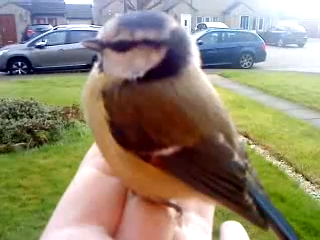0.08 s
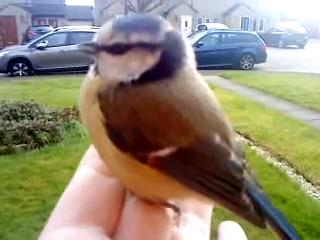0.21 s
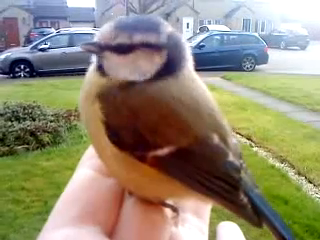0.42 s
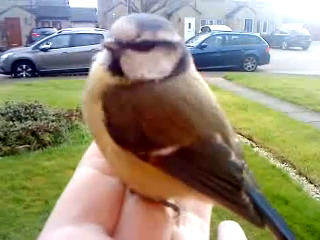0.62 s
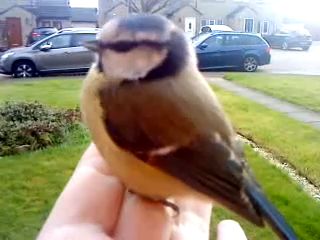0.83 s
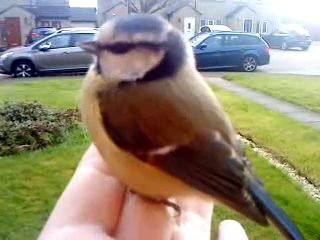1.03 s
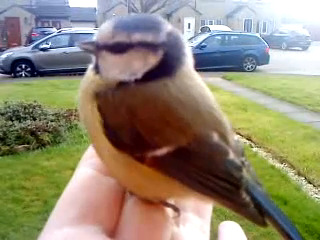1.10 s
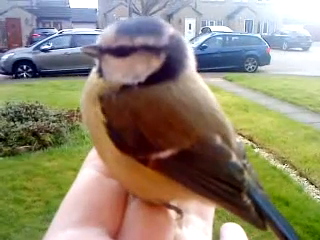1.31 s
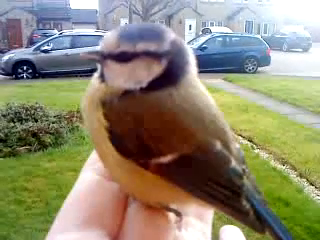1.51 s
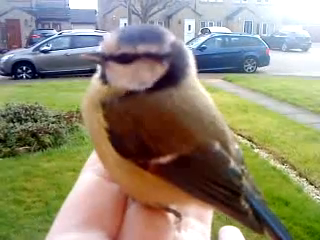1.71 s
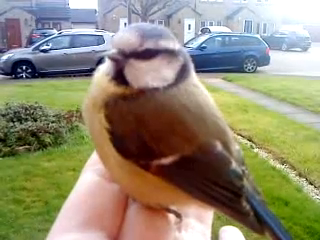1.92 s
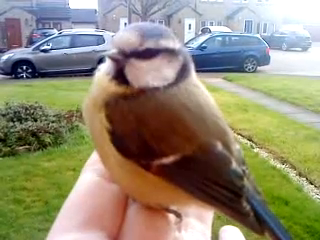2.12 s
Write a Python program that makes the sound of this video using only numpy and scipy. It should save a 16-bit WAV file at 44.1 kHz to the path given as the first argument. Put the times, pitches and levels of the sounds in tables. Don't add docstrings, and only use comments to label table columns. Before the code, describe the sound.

A small bird held close chatters in dry, clicking bursts while wind buffets the microphone outdoors

```python
import sys
import numpy as np
from scipy import signal
from scipy.io import wavfile

SR = 44100
rng = np.random.default_rng(int(sys.argv[2]) if len(sys.argv) > 2 else 0)


def level_to_linear(level):
    exponent = np.asarray(level, float) / 20
    return 10 ** exponent


def unload_audio(sound):
    columns = np.transpose(np.atleast_2d(sound))
    steps = np.round(np.clip(columns, -1, 1) * 32767)
    wavfile.write(sys.argv[1], SR, steps.astype(np.int16))


N = 94815

# t/s, peak level/dB, ring f/Hz
CLICKS = [(1.0404, -18, 3890), (1.0436, -10, 3900), (1.0455, -11, 3850), (1.0471, -14, 3890),
          (1.0506, -13, 3890), (1.2062, -13, 3930), (1.2108, -13, 3870), (1.2126, -12.5, 3650),
          (1.2141, -20, 4150), (1.3595, -13, 3850), (1.5155, -17, 4000), (1.5191, -18, 3990),
          (1.5208, -13, 4040), (1.5228, -15, 4040), (1.6921, -10, 3960), (1.6941, -12, 4010),
          (1.6962, -14, 3980), (1.6988, -17.5, 3500), (1.8513, -18, 4050), (1.8546, -20, 4020),
          (1.8596, -17, 3960), (1.862, -18, 3270), (1.8638, -21, 4150)]
# t/s, peak level/dB, ring f/Hz
MORE_CLICKS = [(0.6888, -38.5, 3900), (0.8306, -25.5, 4070), (0.8367, -29, 4060), (0.876, -37, 4000),
               (1.0337, -30.5, 4170), (1.0346, -27, 3930), (1.037, -23, 3790), (1.048, -20, 3850),
               (1.0491, -22.5, 3860), (1.056, -34, 4220), (1.2164, -30, 3800), (1.218, -27, 3750),
               (1.2505, -43, 3720), (1.3586, -28, 3850), (1.3645, -26, 3860), (1.385, -37.5, 4100),
               (1.524, -17, 4000), (1.526, -33, 4050), (1.528, -32, 4050), (1.542, -29.5, 4100),
               (1.6674, -38, 4000), (1.6908, -29, 4000), (1.6975, -21, 4000), (1.7002, -23, 4000),
               (1.704, -32, 4050), (1.7075, -43, 4070), (1.7134, -30, 4100), (1.869, -32, 4120),
               (1.8706, -29.5, 4050), (1.877, -36, 4190), (1.8792, -32, 4200), (1.987, -42.5, 3730),
               (2.1042, -44.5, 4050)]
# start t/s, length t/s, level/dB, side-mode level/dB
RASPS = [(0.8394, .003, -41, -15), (0.844, 0.0052, -32, -11.5), (0.85, 0.007, -34.5, -10.5),
         (0.857, .003, -40, -11), (0.881, 0.044, -56, -6), (1.027, 0.016, -34.5, 8),
         (1.049, 0.0058, -30.5, -5), (1.167, 0.035, -51.5, 15), (1.2, 0.023, -31.5, 4.5),
         (1.243, 0.012, -51, 16.5), (1.352, 0.02, -35.5, 10), (1.516, 0.016, -42, 21.5),
         (1.53, 0.016, -49, 3), (1.6655, 0.0044, -43, 18), (1.685, 0.0047, -38, 10),
         (1.51, 0.0045, -52, 9.5), (1.693, 0.0084, -28.5, 3.5), (1.7, 0.006, -36, 9),
         (1.859, 0.011, -30, 14), (1.874, 0.014, -43.5, 14), (2.1, 0.015, -48, 8)]
# f/Hz, level/dB, time to fall 60 dB t/s
SIDE_MODES = [(614, -22.5, 0.0078), (1753, -24, 0.0063), (1950, -17.5, 0.0053), (2640, -14.5, 0.004),
              (3180, -16.5, 0.0081), (4610, -20.5, 0.0045), (5770, -51, 0.0095), (5806, -22.5, 0.017),
              (6650, -31, 0.016), (7900, -17, 0.0016)]
# t/s, level/dB
GUST = [(0.0, -51), (0.2, -48), (0.26, -24.5), (0.32, -49), (0.409, -24), (0.44, -27.5), (0.5, -29.5),
        (0.9, -18.5), (0.99, -24.5), (1.02, -21), (1.15, -27.5), (1.18, -39), (1.23, -32), (1.3, -19.5),
        (1.62, -27), (1.87, -37.5), (1.93, -35.5), (2.15, -29)]
# start t/s, length t/s, level/dB, eddy brightness f/Hz
FLURRIES = [(0.163, 0.17, -38, 93), (0.394, 0.027, -37, 107), (0.494, 0.062, -30.5, 133.3),
            (0.561, 0.067, -34, 292), (0.602, 0.097, -30, 208), (0.733, 0.084, -30.5, 200),
            (0.757, 0.033, -36, 486), (0.558, 0.021, -37, 332), (0.8, 0.058, -32, 175),
            (0.854, 0.068, -29.5, 111), (0.985, 0.096, -34, 109), (1.101, 0.093, -27.5, 89.6),
            (1.201, 0.045, -29.5, 205), (1.227, 0.045, -29, 152), (1.359, 0.041, -33, 190),
            (1.498, 0.083, -33.5, 159), (1.568, 0.083, -29, 102), (1.619, 0.12, -34, 120),
            (1.931, 0.041, -36, 108)]
# t/s, peak level/dB, width t/ms
PUSHES = [(.512, -21, 3.4), (.5728, -12, 1.7), (.5922, -16, 2.2), (.6068, -9.5, 2.6), (.6182, -19, 2.1),
          (.6583, -19, 2.2), (.6812, -22, 4.6), (.7263, -22, 2.9), (.7463, -20, 2.5), (.751, -19, 1.7),
          (.7743, -16, 1.5), (.7833, -17, 1.6), (.7901, -21, 1.8), (.7999, -12, 2.1), (.8205, -17, 3.3),
          (.8658, -22, 2.6), (1.0291, -17, 2.8), (1.2226, -10, 1.5), (1.2444, -22, 7), (1.3759, -18, 2.5),
          (1.5103, -20, 3), (1.5477, -11.5, 3.2), (1.0424, -22, 4.6), (1.1413, -23, 4.8)]
# t/s, peak level/dB, width t/ms
PULLS = [(.249, -24, 9), (.4038, -20, 4.5), (.526, -14.5, 3.9), (.5858, -13, 2.2), (.6025, -18, 2.5),
         (.6401, -19, 1.4), (.6925, -22, 4.9), (.7427, -20, 1.7), (.7552, -18, 3), (.7677, -11, 3.2),
         (.846, -18, 1.7), (.8795, -15, 3.7), (1.136, -16, 4.6), (1.2318, -21, 5), (1.26, -20, 3.5),
         (1.3719, -24, 2.2), (1.3805, -24, 2.5), (1.5146, -12, 2.9), (1.5522, -18, 3.6), (.5772, -18, 3),
         (.6141, -21, 3), (1.6002, -19, 5.1), (1.6225, -22, 5.6), (1.6695, -22, 5.8)]
# multiple of its pitch, level/dB
ENGINE_HARMONICS = [(1, -47.5), (2, -48), (3, -61)]
# t/s, level/dB
ENGINE_SWELL = [(0, -1.5), (.08, 4), (.16, -2.5), (.29, 8.5), (.37, -3.5), (0.431, 2.5), (0.902, -0.6),
                (1.5, -5), (1.9, 1.2), (2.15, -2.5)]
# start t/s, length t/s, first f/Hz, last f/Hz, level/dB
WHISTLES = [
    (.895, .122, 7500, 6800, -63),
    (1.13, .072, 7400, 7000, -62.5),
]
# f/Hz, level per Hz/dB
STREET_COLOR = [(40, -6), (130, -8.5), (300, -10.5), (600, -24.5), (1300, -28.5), (4000, -34),
                (6500, -40.5), (8500, -39)]
# t/s, level/dB
TRAFFIC = [(0, 0), (.45, 0.5), (.7, -2.5), (1.4, -1.5), (1.7, -1.1), (2.15, -0.4)]

MAIN_T60_S, MAIN_RISE_HZ = 0.0056, 880
AFTER_HZ, AFTER_T60_S, AFTER_DB = 4200, 0.022, -24
MODE_LUCK_DB, SNAP_LUCK_DB = 3.0, 2.5
CLICK_LEAD_S, RASP_HZ, RASP_CLICKS_PER_S = 0.0003, 4126, 2500
GUST_HZ, EDDY_SLOPE, EDDIES_PER_S = 49.3, 2.64, 600
PORT_LAG_S, PORT_TOP_HZ, PORT_CUT_HZ = 0.0006, 750, 24
ENGINE_HZ, ENGINE_SAG_HZ_PER_S, ENGINE_FLUTTER_DB = 147.3, 11.0, 3.2


def t():
    return np.arange(N) / SR


def curve(points):
    return np.interp(t(), *np.transpose(points))


def rms_one(x):
    return x / np.sqrt(np.mean(x ** 2) + 1e-20)


def drift(rate):
    r = np.exp(-2 * np.pi * rate * 40 / SR)
    noise = rng.standard_normal(N // 40 + 2002)
    slow = signal.lfilter([1], [1, -2 * r, r * r], noise)[2000:]
    return np.interp(np.arange(N) / 40, np.arange(len(slow)), rms_one(slow - slow.mean()))


def butter(x, order, hz, kind="low"):
    return signal.sosfilt(signal.butter(order, hz, kind, fs=SR, output="sos"), x)


def ring(clicks, hz, t60):
    r, w = level_to_linear(-60 / (t60 * SR)), 2 * np.pi * hz / SR
    return signal.lfilter([0, np.sin(w)], [1, -2 * r * np.cos(w), r * r], clicks + 1e-18)


def beak_and_throat(clicks, hz, snap_db):
    r, w = np.exp(-2 * np.pi * MAIN_RISE_HZ / SR), 2 * np.pi * hz / SR
    main = ring(clicks, hz, MAIN_T60_S)
    main = signal.lfilter([1 - r], [1, -2 * r * np.cos(w), r * r], main) * 2 * np.sin(w)
    out = level_to_linear(5.0) * main + level_to_linear(AFTER_DB) * ring(clicks, AFTER_HZ, AFTER_T60_S)
    luck = np.clip(rng.normal(0, 1, (3, len(SIDE_MODES))), -1.5, 1.5)
    snap_db = snap_db + SNAP_LUCK_DB * luck[1, 0]
    for k, (mode_hz, db, t60) in enumerate(SIDE_MODES):
        gain = level_to_linear(db + snap_db + MODE_LUCK_DB * luck[0, k])
        out = out - gain * ring(clicks, mode_hz * (1 + 0.056 * luck[2, k]), t60)
    return out


def chatter():
    out, size = np.zeros(N + SR), 4096
    for s, db, hz in list(CLICKS) + list(MORE_CLICKS):
        i = int((s - CLICK_LEAD_S) * SR)
        click = np.arange(size) == 0
        out[i:i + size] += level_to_linear(db) * beak_and_throat(click, np.clip(hz + 70, 3350, 4350), snap_db=0.43)
    for s, length, db, snap_db in RASPS:
        i = int(s * SR)
        part = np.clip(np.arange(size) / SR / length, 0, 1)
        grains = (rng.random(size) < RASP_CLICKS_PER_S / SR) * rng.uniform(-1, 1, size)
        grains = grains * np.sin(np.pi * part) ** 0.5
        out[i:i + size] += level_to_linear(db) * beak_and_throat(grains, RASP_HZ, snap_db)
    above = butter(out[:N], 3, 1360, "high")
    below = butter(out[:N], 2, [450, 800], "band")
    return above + level_to_linear(-1) * below


def garden(x):
    notch_hz, notch_width_hz, echo_db, echo_t60_s = 4957, 870, -24, 0.11
    hollow = signal.lfilter(*signal.iirnotch(notch_hz, notch_hz / notch_width_hz, SR), x)
    x = 0.22 * x + 0.66 * hollow
    lag = np.arange(SR // 4) / SR
    smear = rng.standard_normal(len(lag)) * level_to_linear(-60 * lag / echo_t60_s) * np.clip(lag / 0.0084, 0, 1)
    smear = smear / np.sqrt(np.sum(smear ** 2))
    return x + level_to_linear(echo_db) * signal.fftconvolve(x, smear)[:N]


def buffets():
    out = np.zeros(N)
    for sign, table in [(1, PUSHES), (-1, PULLS)]:
        for s, peak_db, ms in table:
            u = (t() - s + PORT_LAG_S) / (ms * 0.0011 * 0.74)
            lump = (1 - 0.5 * u ** 2) / (1 + 0.5 * u ** 2) ** 2.5
            out = out + sign * level_to_linear(peak_db + 0.5) * lump
    return out


def wind():
    ladder = 24 * 2 ** np.arange(0, 5.5, 0.5)
    bands = []
    for hz in ladder:
        hits = (rng.random(N) < EDDIES_PER_S / SR) * rng.standard_normal(N) + 1e-18
        bands.append(rms_one(butter(hits, 2, [hz / 1.194, hz * 1.191], "band")))
    bands = np.array(bands)
    slow_eddies = (1 / (1 + (ladder / GUST_HZ) ** EDDY_SLOPE)) @ bands
    out = level_to_linear(curve(GUST) - 2.5) * slow_eddies / 2
    for s, length, db, hz in FLURRIES:
        share = ladder / hz
        quick_eddies = (share ** 0.47 / (1 + share ** (EDDY_SLOPE + 1.4))) @ bands
        part = np.clip((t() - s) / length, 0, 1)
        out = out + level_to_linear(db) * np.sin(np.pi * part ** 0.67) ** 1.06 * quick_eddies
    out = butter(out + buffets(), 4, PORT_TOP_HZ)
    return butter(out, 1, PORT_CUT_HZ, "high")


def engine():
    hz = ENGINE_HZ - ENGINE_SAG_HZ_PER_S * t() + 0.91 * drift(4.9)
    phase = 2 * np.pi * np.cumsum(hz) / SR
    swell_db = curve(ENGINE_SWELL)
    out = np.zeros(N)
    for multiple, db in ENGINE_HARMONICS:
        level_db = db + swell_db + ENGINE_FLUTTER_DB * drift(10)
        out = out + level_to_linear(level_db) * np.sin(round(multiple) * phase)
    return out


def far_whistles():
    out = np.zeros(N)
    for s, length, first_hz, last_hz, db in WHISTLES:
        part = np.clip((t() - s) / length, 0, 1)
        hz = first_hz + (last_hz - first_hz) * part ** 2.3 + 55 * drift(44.7)
        level = level_to_linear(db + 3 * drift(70)) * np.sin(np.pi * part) ** 0.5
        out = out + level * np.sin(2 * np.pi * np.cumsum(hz) / SR)
    return out


def street():
    out, white = 0, rng.standard_normal((2, N))
    edges = 28 * 2 ** np.arange(0, 9, 0.5)
    color_hz, color_db = np.transpose(STREET_COLOR)
    traffic_db = curve(TRAFFIC)
    for k, (low, high) in enumerate(zip(edges, edges[1:])):
        band = butter(white[k % 2], 2, [low, high], "band")
        db = np.interp(np.log(low * high) / 2, np.log(color_hz), color_db)
        flicker_db = 2 if low < 3000 else 1
        db = db + flicker_db * drift(6.9) + (low < 3000) * traffic_db
        out = out + level_to_linear(db) * band
    return level_to_linear(-43.5) * rms_one(out)


def scene():
    return (garden(chatter()) + wind() + engine() + far_whistles() + street())[None]


def band_limit(x):
    return signal.sosfilt(signal.butter(12, 9020, fs=SR, output="sos"), x)


def record(dry):
    x = butter(dry, 3, 7800)
    x = signal.sosfilt(signal.cheby2(10, 60, 9650, fs=SR, output="sos"), x)
    return band_limit(x)


dry = scene()
out = record(dry)
unload_audio(out)
```